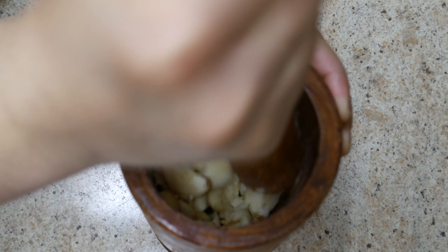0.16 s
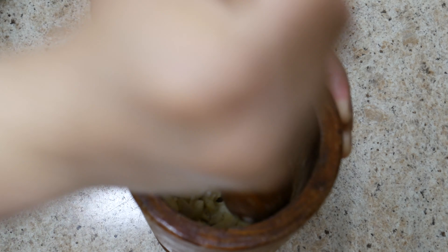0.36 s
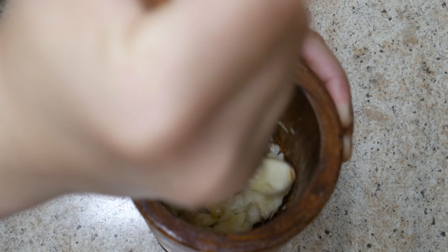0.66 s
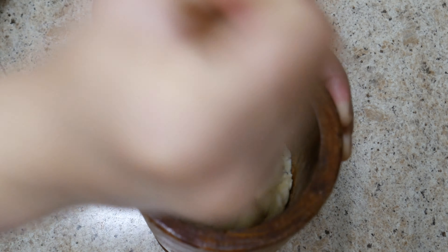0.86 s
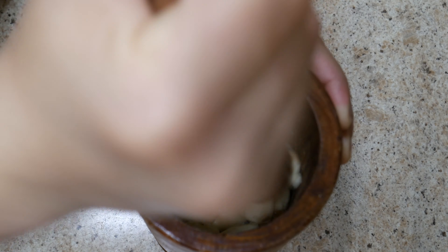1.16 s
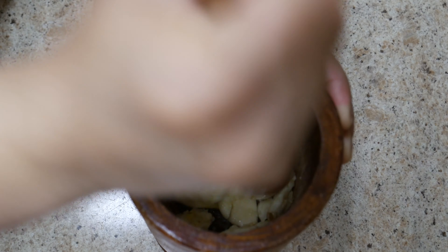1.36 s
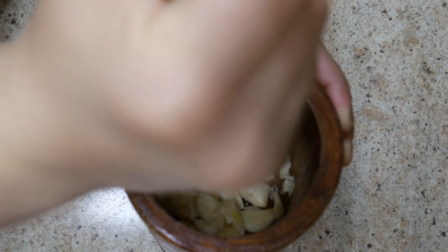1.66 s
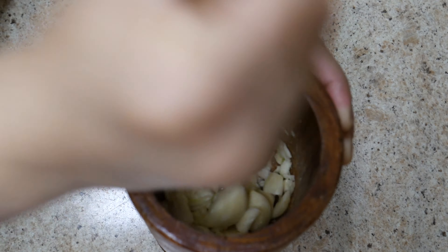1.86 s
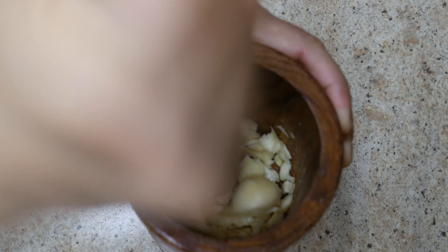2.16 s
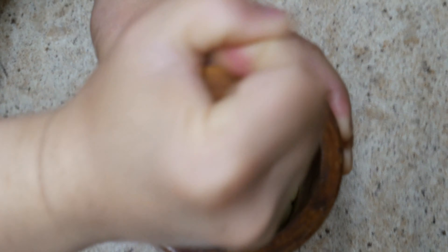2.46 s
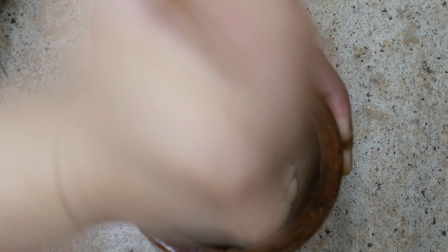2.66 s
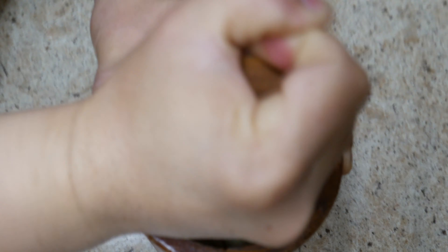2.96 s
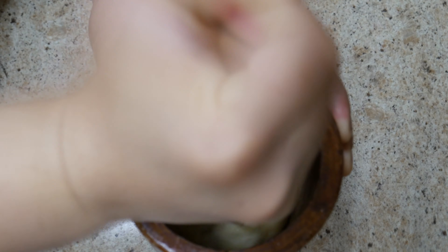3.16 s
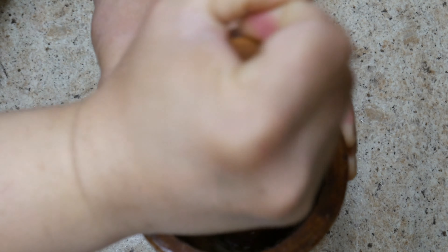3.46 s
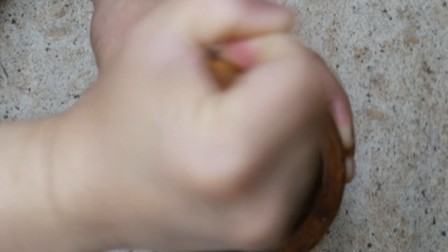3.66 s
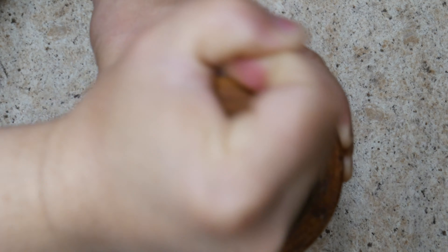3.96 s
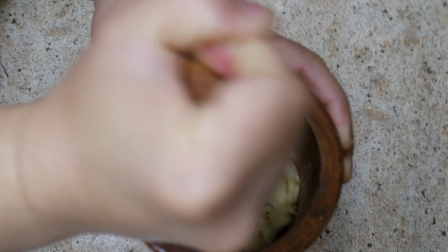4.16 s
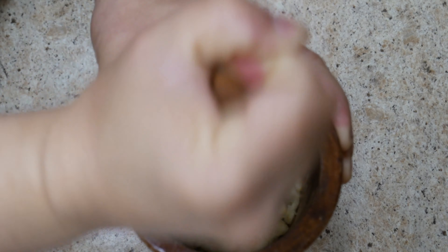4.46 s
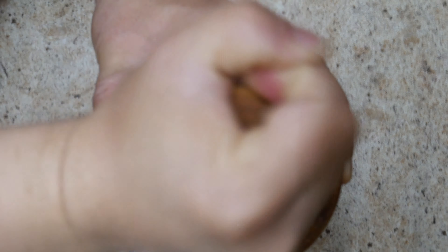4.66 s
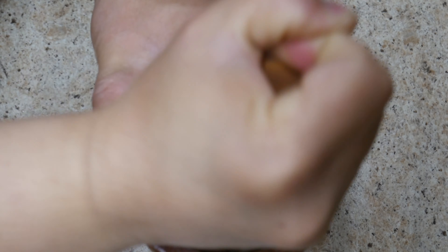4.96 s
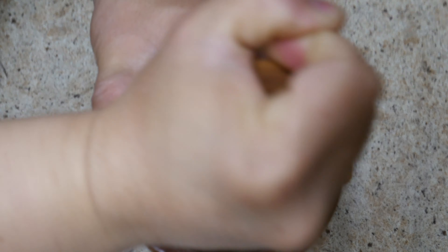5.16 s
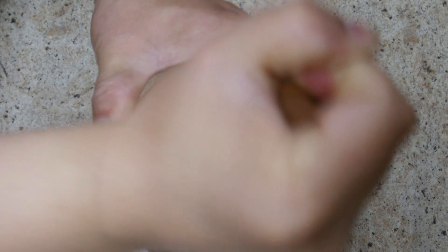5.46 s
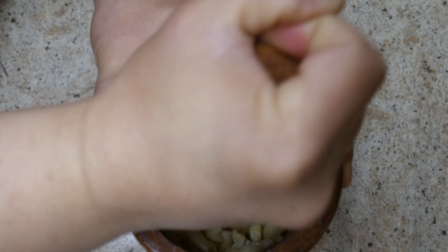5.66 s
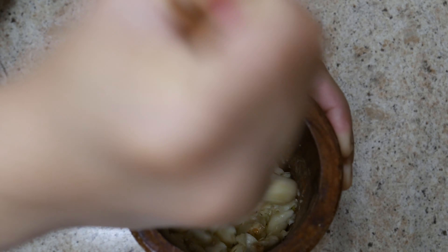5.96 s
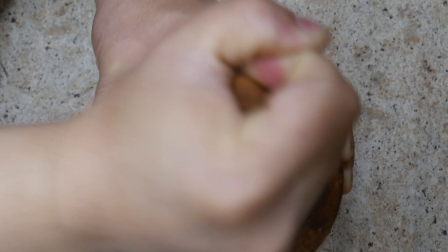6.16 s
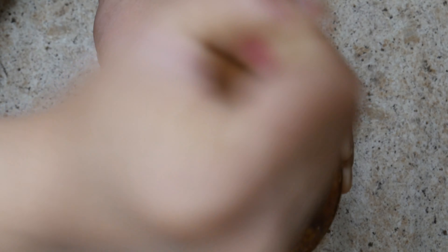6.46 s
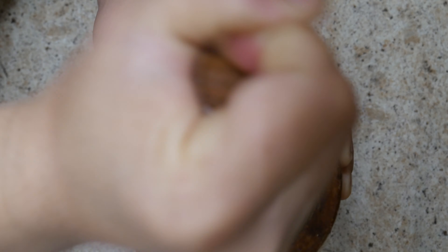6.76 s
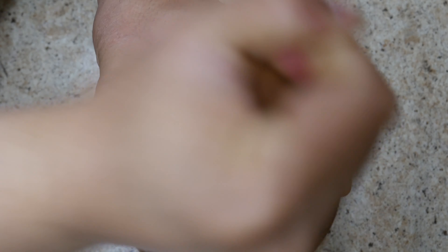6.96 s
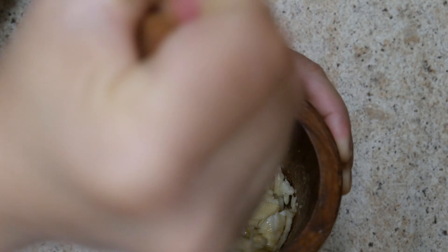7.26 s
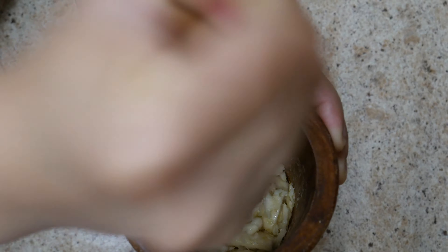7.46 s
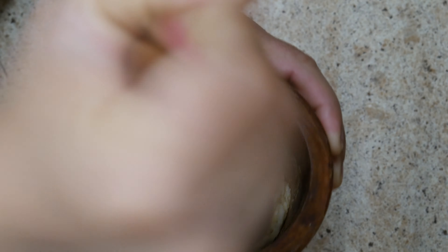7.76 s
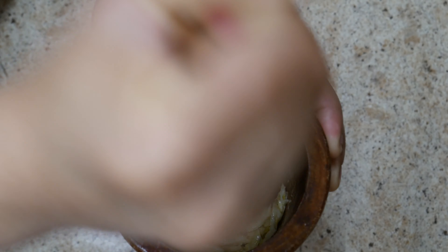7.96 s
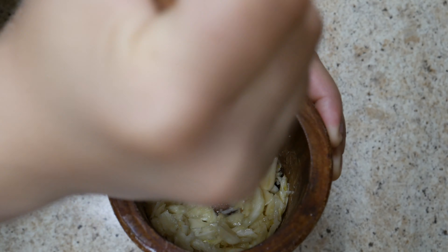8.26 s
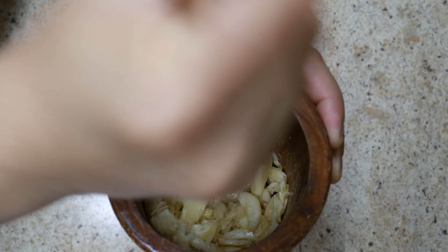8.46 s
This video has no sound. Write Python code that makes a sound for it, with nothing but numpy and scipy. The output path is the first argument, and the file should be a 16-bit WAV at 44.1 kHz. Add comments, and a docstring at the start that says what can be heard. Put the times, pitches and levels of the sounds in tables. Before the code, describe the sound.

Quick, regular thuds of a wooden pestle crushing garlic in a wooden mortar run from start to finish, heard close up in a small kitchen. The blows crunch and crack, mixed with uneven knocks and short scrapes on the side of the bowl. The sticky paste gives a brief squelch and squeak before the middle, and the side knocks grow stronger just afterwards. A faint house rumble lies underneath.

```python
"""A wooden pestle pounds garlic and salt in a wooden mortar, close by, four blows a second.
On the way down the pestle often knocks the wall and scrapes along it. The garlic fractures under
rising pressure until the pestle bottoms out with a crack, which excites the modes of the bowl and
thumps the counter. As it lifts, the wet paste crackles and now and then squeaks by stick-slip
friction, while the echoes of a small kitchen decay into the low rumble of the house."""
import sys
import numpy as np
from scipy import signal
from scipy.fft import rfft, irfft
from scipy.io import wavfile

SR = 44100
rng = np.random.default_rng(int(sys.argv[2]) if len(sys.argv) > 2 else 0)


def int16_out(signal):
    """Quantize to a 16-bit WAV file."""
    q = np.round(np.clip(np.atleast_2d(signal).T, -1, 1) * 32767)
    wavfile.write(sys.argv[1], SR, q.astype(np.int16))


N = 379409
RING_S = np.arange(SR // 2) / SR  # time since a contact
AROUND_S = np.arange(-(SR // 10), SR // 10) / SR  # time before and after a contact


def undb(db):
    """Decibels as an amplitude ratio."""
    return 10 ** (np.asarray(db) / 20)


def level(x, db):
    """Equal energy: scale a short sound to the energy of 50 ms at this level."""
    return x * undb(db) / np.sqrt(np.sum(x ** 2) / (SR / 20) + 1e-18)


def add(track, start_s, x):
    """Superposition: mix x into the track from start_s."""
    i = int(round(start_s * SR))
    a, b = max(i, 0), min(i + len(x), N)
    if b > a:
        track[a:b] += x[a - i:b - i]


def colour(x, points, size=2048):
    """Minimum-phase filtering through (frequency_hz, gain_db) points."""
    hz, db = np.transpose(points)
    bins_hz = np.arange(size // 2 + 1) * SR / size
    gain = undb(np.interp(np.log(bins_hz + 1), np.log(hz), db))
    cepstrum = irfft(np.log(gain))
    cepstrum[1:size // 2] *= 2
    cepstrum[size // 2 + 1:] = 0
    return signal.fftconvolve(x, irfft(np.exp(rfft(cepstrum))))[:len(x)]


def ring(modes, detune, scatter_db, build_s, wave=np.sin):
    """Damped modes build up and decay, a little different in pitch and strength at each touch."""
    tone = np.zeros(len(RING_S))
    for hz, db, t60_s in modes:
        pitch_hz = hz * (1 + detune * rng.standard_normal())
        gain = undb(db + scatter_db * rng.standard_normal())
        tone += gain * wave(2 * np.pi * pitch_hz * RING_S) * 1000 ** (-RING_S / t60_s)
    return tone * (1 - np.exp(-RING_S / build_s))


def push(x, contact_s):
    """Finite contact time: a force that rises quickly and eases off low-passes the blow."""
    t = RING_S[:SR // 50]
    return signal.fftconvolve(x, t * np.exp(-t / contact_s))[:len(x)]


def grains(size, per_s, spread_db, hiss, burst_db=2.0, burst_s=0.0029):
    """Shot noise: uneven tiny fractures over a hiss, in bursts as layer after layer gives way."""
    strengths = undb(spread_db * np.minimum(rng.exponential(size=size), 4)) * rng.standard_normal(size)
    clicks = strengths * (rng.random(size) < per_s / SR)
    bursts = np.interp(np.arange(size) / SR / burst_s, np.arange(size), rng.standard_normal(size))
    return (clicks / np.std(clicks) + hiss * rng.standard_normal(size)) * undb(burst_db * bursts)


# background spectrum of the house: frequency_hz, gain_db
HOUSE_SPECTRUM = [(12, -8.5), (22, 16), (40, 0), (100, -8), (200, -18), (480, -22.5), (900, -28.5),
                  (1500, -33), (4500, -43.5), (8500, -54.5), (11000, -57), (16000, -61)]


def room_tone():
    """Stationary noise: the low rumble and faint hiss of the house."""
    noise = colour(rng.standard_normal(N), HOUSE_SPECTRUM, size=8192)
    return noise / np.std(noise) * undb(-37.5)


def reflections():
    """Impulse response: early echoes off counter and near wall, a far-wall cluster, a diffuse tail."""
    t = np.arange(SR) / SR
    near, low, high, far = rng.standard_normal((4, SR))
    near *= np.exp(-t / 0.018) * (t > 0.004)
    far *= np.exp(-((t - 0.074) / 0.017) ** 2)
    low = signal.lfilter(*signal.butter(2, 3000, "low", fs=SR), low)
    high = signal.lfilter(*signal.butter(2, 3000, "high", fs=SR), high)
    low_t60_s, high_t60_s = 0.55, 0.61
    tail = (low * 1000 ** (-t / low_t60_s) + high * 1000 ** (-t / high_t60_s)) * np.minimum(t * 50, 1)
    return sum(undb(db) * x / np.linalg.norm(x) for x, db in ((near, -10), (tail, -14.5), (far, -24)))


# frequency response of the kitchen's echoes: frequency_hz, gain_db
KITCHEN_RESPONSE = [(40, -43), (150, 1), (250, -3), (350, 6), (500, -0.5), (680, -3), (1000, 6.5),
                    (2000, -3), (4000, -2.5), (9000, -3.5), (16000, -5)]


def kitchen(x):
    """Time-varying reverberation: the arm moves over the bowl, so each stroke has its own echoes."""
    out = np.zeros(N)
    landings_s = np.array(LANDINGS)[:, 0]
    edges = np.r_[0, (landings_s[1:] + landings_s[:-1]) / 2 * SR, N].astype(int)
    for a, b in zip(edges, edges[1:]):
        add(out, a / SR, signal.fftconvolve(x[a:b], reflections()))
    return colour(out, KITCHEN_RESPONSE)


# wet garlic slipping under the pestle: peak_s, level_db, half_width_s
SLIPS = [(.376, -43, .013), (3.431, -31, .012), (3.56, -51, .008)]
# resonances of the squeak: pitch_hz, gain_db, t60_s
SQUEAK_MODES = [(2240, -3.5, 0.028), (4890, -3, 0.032)]


def squeaks():
    """Stick-slip friction: short swells of slipping drive two narrow resonances."""
    out = np.zeros(N)
    t = AROUND_S
    for peak_s, level_db, half_width_s in SLIPS:
        slips = grains(len(t), per_s=3000, spread_db=1.2, hiss=0.3) * np.exp(-(t / half_width_s) ** 2)
        resonance = ring(SQUEAK_MODES, detune=0.008, scatter_db=1.5, build_s=0.00038)
        add(out, peak_s + t[0], level(signal.fftconvolve(slips, resonance), level_db))
    return out


# sticky smacks of the paste as the pestle pulls free: start_s, level_db, decay_s
SMACKS = [(0.365, -42, 0.017), (2.785, -55, .008), (3.352, -40.5, 0.023), (3.396, -29, 0.041),
          (3.426, -25.5, 0.009), (4.058, -47, 0.0027), (4.386, -34, 0.018), (4.556, -48, 0.0092),
          (5.596, -29.5, 0.022), (6.92, -43.5, .012)]
# spectrum of the sticky paste: frequency_hz, gain_db
PASTE_SPECTRUM = [(200, 8.5), (450, 10.5), (620, 10), (900, -2.5), (1600, -7), (2250, 4.5), (2900, -9),
                  (3600, -3), (4500, -2), (5050, -5), (5600, -4), (8500, -12), (10500, -22), (16000, -29)]


def paste():
    """Adhesion: the paste smacks as the pestle pulls free of it, and crackles faintly each time it lifts."""
    out = np.zeros(N)
    for start_s, level_db, decay_s in SMACKS:
        envelope = np.exp(-RING_S / decay_s) * (1 - np.exp(-RING_S / 0.0044))
        smack = grains(len(RING_S), per_s=1500, spread_db=1.3, hiss=1) * envelope
        add(out, start_s, level(colour(smack, PASTE_SPECTRUM), level_db))
    t = RING_S[:SR // 10]
    for landing_s, *_ in LANDINGS:
        for lift_s in rng.uniform(0.03, 0.16, size=2):
            crackle = grains(len(t), per_s=2800, spread_db=3.9, hiss=0.45) * t * np.exp(-t / 0.0036)
            add(out, landing_s + lift_s, level(colour(crackle, PASTE_SPECTRUM), rng.normal(-54.5, 1.9)))
    return out


# spectrum of wood striking wood: frequency_hz, gain_db
CLACK_SPECTRUM = [(400, -19), (750, 6), (1000, 1.5), (1400, -4), (1900, -1.5), (3000, -22), (5500, -21.5),
                  (9000, -41), (16000, -41)]


def clack(decay_s):
    """Modal overlap: crowded, heavily damped wood modes merge into a burst of noise."""
    return colour(rng.standard_normal(len(RING_S)) * np.exp(-RING_S / decay_s), CLACK_SPECTRUM)


# knocks on the mortar's wall: start_s, level_db, upper_relative_db, scrape_db
KNOCKS = [(.235, -49, -16, -50), (.4865, -29.5, -10.5, -39), (.974, -45, 7.5, -22.5),
          (1.2295, -34, -9, -16.5), (1.977, -30, -15, -18), (2.452, -39, -9, -31),
          (2.6934, -37.5, -6, -26.5), (3.1654, -33.5, -5, -52), (3.91, -53, -19, -27),
          (4.1498, -20.5, -1, -22), (4.3653, -22.5, -8.5, -37), (4.857, -30, -15, -35.5),
          (5.0616, -21, -8.5, -32), (5.3075, -22.5, -7.5, -27), (5.534, -31.5, -8, -27.5),
          (6.8254, -37, 12, -24.5), (7.03, -22.5, -5, -26.5), (8.278, -29.5, -12, -35),
          (8.5206, -30, 0, -52)]
# low and upper modes of the wall, struck with the pestle high: pitch_hz, gain_db, t60_s
WALL_LOW_MODE = [(769, -13.5, 0.04)]
WALL_UPPER_MODES = [(937, -1.5, 0.025), (1151, 11.5, 0.018), (1360, 2, 0.029), (1960, -25, 0.01),
                    (2105, -6.5, 0.042), (2440, -3, 0.031), (3540, -8, 0.034), (4700, -11, .012)]
# spectrum of the pestle sliding on the wall: frequency_hz, gain_db
SCRAPE_SPECTRUM = [(250, -3), (480, 1.5), (625, 13), (800, -14), (1150, -17), (1600, -21), (2250, -8.5),
                   (2800, -19.5), (5200, -19), (9000, -27), (10500, -37), (16000, -39)]


def wall():
    """Impact, then sliding friction: the pestle knocks the wall and scrapes down with growing force."""
    out = np.zeros(N)
    landings_s = np.array(LANDINGS)[:, 0]
    for start_s, level_db, upper_relative_db, scrape_db in KNOCKS:
        slide_s = landings_s[landings_s > start_s][0] - start_s
        air_hz = 679 - 680 * slide_s  # a knock higher up gives a longer slide and a lower note
        low = ring([(air_hz, -1.5, 0.047), *WALL_LOW_MODE], detune=0.012, scatter_db=2, build_s=0.0008)
        upper = ring(WALL_UPPER_MODES, detune=0.047, scatter_db=1.5, build_s=0.00072)
        upper = level(upper, 0) + level(clack(decay_s=0.0053), 1.1)
        base = ring(BASE_MODES, detune=0.057, scatter_db=2.3, build_s=0.0022)
        knock = level(low, 0) + level(upper, upper_relative_db) + level(base, -9)
        t = RING_S - slide_s  # zero at the landing, which damps the wall
        add(out, start_s, knock * np.exp(-np.maximum(t, 0) / 0.0048) * undb(level_db))
        scrape = colour(grains(len(t), per_s=3000, spread_db=1.5, hiss=0.41), SCRAPE_SPECTRUM)
        force = swell(t, rise_s=0.33, fall_s=0.0029)
        add(out, start_s, scrape / np.std(scrape) * force * undb(scrape_db))
    return out


def swell(t, rise_s, fall_s):
    """Exponential growth up to t = 0 and exponential decay after it."""
    return np.exp(np.where(t < 0, t / rise_s, -t / fall_s))


def slide_before(landing_s):
    """Duration of sliding contact with the wall before a landing; zero for a clean stroke."""
    return max((landing_s - s for s, *_ in KNOCKS if 0 < landing_s - s < 0.15), default=0)


# spectra of the crunch, the bowl's dull groan and the final crack: frequency_hz, gain_db
CRUNCH_SPECTRUM = [(300, 9), (900, -9.5), (1600, -4), (2100, -3.5), (3000, -3), (4600, -4), (6600, -8.5),
                   (8600, -4.5), (10200, -17), (12500, -13.5), (16000, -24)]
GROAN_SPECTRUM = [(40, -12.5), (120, 2), (250, -2.5), (420, 0), (650, 2.5), (850, -5.5), (1300, -22.5),
                  (3000, -21.5), (16000, -40)]
CRACK_SPECTRUM = [(500, 2.5), (1400, -7.5), (2050, -22.5), (2700, 3.5), (3400, -1.5), (4400, 0), (5400, -6),
                  (6600, -7.5), (8400, -5), (10000, -16.5), (12000, -16), (16000, -24)]


def garlic():
    """Fracture under load: cloves and salt crunch, shake the bowl and crack as the pestle lands."""
    out = np.zeros(N)
    t = AROUND_S
    for landing_s, weight_db, wood_db, crack_db, crunch_db, *_ in LANDINGS:
        start_s = landing_s + t[0]
        squeeze_s = 0.0042 + 0.025 * slide_before(landing_s)  # sliding slows the pestle
        pressure = swell(t, rise_s=squeeze_s, fall_s=0.0069)
        crunch = pressure * grains(len(t), per_s=6000, spread_db=1.94, hiss=0.55)
        add(out, start_s, level(colour(crunch, CRUNCH_SPECTRUM), crunch_db))
        groan = swell(t, rise_s=0.0055, fall_s=0.0026) * rng.standard_normal(len(t))
        add(out, start_s, level(colour(groan, GROAN_SPECTRUM), weight_db - 14))
        db_per_octave = 0.2 * (wood_db - USUAL_WOOD_DB)  # bare wood brightens the crack
        tilted = [(hz, db + db_per_octave * np.log2(hz / 3000)) for hz, db in CRACK_SPECTRUM]
        snap = swell(t, rise_s=0.0012, fall_s=0.0029)
        crack = snap * grains(len(t), per_s=14000, spread_db=1.3, hiss=1)
        add(out, start_s, level(colour(crack, tilted), crack_db))
    return out


# modes of the counter, the base rocking on it, the bowl with the pestle down in it,
# and the bending pestle: pitch_hz, gain_db, t60_s
COUNTER_MODES = [(20.84, -8.5, 0.38), (35.6, -16.5, 0.4), (41.5, -4, 0.37), (60, 0.5, 0.15),
                 (70.7, 2.5, 0.14), (83.6, -0.5, 0.22), (114.5, -3, 0.19)]
BASE_MODES = [(182, -0.5, 0.023), (223, 0.5, 0.059), (254.2, 8, 0.037), (316.8, 1.5, 0.054),
              (349, -9.5, 0.11)]
BOWL_MODES = [(664.7, 17, 0.031), (767, -4.5, 0.072)]
PESTLE_MODES = [(2004, -1.5, 0.028), (2166, 10, 0.009), (2230, -10, 0.004)]
# the pestle bottoms out: landing_s, weight_db, wood_db, crack_db, crunch_db, air_db, air_hz
LANDINGS = [(.0095, -22, -25, -39, -28, -23.5, 480), (0.2472, -16.5, -29.5, -42, -27, -28, 457),
            (0.4942, -15, -27.5, -39, -29, -24.5, 450), (0.742, -15.5, -24.5, -33.5, -30, -24.5, 453),
            (0.9857, -16, -24, -37, -34, -19, 454), (1.242, -17, -27, -39, -29.5, -30.5, 464),
            (1.4877, -22.5, -28.5, -24, -29.5, -31.5, 480), (1.735, -17.5, -21, -32, -30.5, -21, 490),
            (1.9862, -23, -34, -24, -35, -26.5, 476), (2.2275, -19.5, -33, -41, -26.5, -20.5, 483),
            (2.471, -15.5, -29.5, -44, -26, -26, 476), (2.709, -20.5, -25.5, -36.5, -24.5, -22.5, 457),
            (2.9581, -16.5, -30, -31, -27.5, -25.5, 457), (3.1991, -31, -26, -26.5, -31, -24, 489),
            (3.441, -23, -43, -39, -27, -22, 483), (3.6775, -20, -31.5, -31.5, -23, -28, 438),
            (3.926, -19, -31.5, -34, -24.5, -20, 454), (4.1748, -24, -38, -48, -30.5, -29, 476),
            (4.4201, -15, -21.5, -31.5, -27, -19, 486), (4.6698, -21.5, -28.5, -30.5, -25, -30.5, 453),
            (4.9119, -18.5, -28.5, -32.5, -25, -20.5, 480), (5.16, -17, -28.5, -27.5, -27, -32, 433),
            (5.3961, -19.5, -25, -29, -28.5, -22, 466), (5.6325, -21, -28.5, -43, -26.5, -24, 494),
            (5.8667, -13.5, -40.5, -39.5, -28, -24.5, 426), (6.1025, -14, -21, -26, -35, -25.5, 488),
            (6.3477, -20.5, -21, -26, -31.5, -21.5, 474), (6.6, -19.5, -27.5, -26, -37.5, -24, 456),
            (6.859, -16.5, -22.5, -26.5, -37, -27, 457), (7.0982, -20, -15, -33.5, -31, -21, 463),
            (7.342, -20.5, -35, -29.5, -26, -24.5, 468), (7.582, -16.5, -16, -23.5, -47.5, -21.5, 430),
            (7.8395, -21.5, -33, -36.5, -30.5, -29, 485), (8.0887, -15, -22.5, -30.5, -29, -31, 440),
            (8.3403, -16.5, -33, -32, -27, -30, 460), (8.5695, -14, -25.5, -35.5, -28.5, -28, 540)]
USUAL_WEIGHT_DB, USUAL_WOOD_DB, USUAL_CRACK_DB, USUAL_CRUNCH_DB = -18, -27, -33, -30


def mortar():
    """Impact excitation: each landing rings counter, base, enclosed air, bowl and pestle."""
    out = np.zeros(N)
    for landing_s, weight_db, wood_db, crack_db, crunch_db, air_db, air_hz in LANDINGS:
        counter = ring(COUNTER_MODES, detune=0.03, scatter_db=1, build_s=0.0004, wave=np.cos)
        add(out, landing_s - 0.0004, -level(push(counter, contact_s=0.00056), weight_db))
        # heavy blows and bare wood strengthen the rocking and the clack
        heavy_db, bare_db = weight_db - USUAL_WEIGHT_DB, wood_db - USUAL_WOOD_DB
        base_db = -21 + 0.86 * heavy_db + 0.25 * bare_db
        base = ring(BASE_MODES, detune=0.057, scatter_db=2.5, build_s=0.0049, wave=np.cos)
        add(out, landing_s - 0.0012, -level(push(base, contact_s=0.001), base_db))
        air = ring([(air_hz, 0, 0.05)], detune=0.0041, scatter_db=0, build_s=0.0028)
        bowl = ring(BOWL_MODES, detune=0.031, scatter_db=6.5, build_s=0.0078)
        add(out, landing_s - 0.001, level(air, air_db) + level(bowl, wood_db))
        cushion_db = 0.53 * (crunch_db - USUAL_CRUNCH_DB)  # crunching garlic softens the contact
        clack_db = -36 + 0.7 * heavy_db + 0.71 * bare_db - cushion_db
        add(out, landing_s - 0.002, level(clack(decay_s=0.0072), clack_db))
        glance_db = 3.5 * (slide_before(landing_s) > 0)  # glancing off the wall bends the pestle
        pestle_db = -36 + 0.69 * (crack_db - USUAL_CRACK_DB) + glance_db
        pestle = ring(PESTLE_MODES, detune=0.021, scatter_db=3, build_s=0.0013)
        add(out, landing_s - 0.002, level(pestle, pestle_db))
    return out


def scene():
    """Direct sound, reverberation and background noise add, the same in both ears."""
    wood_and_paste = mortar() + wall() + paste() + squeaks()
    # the crunch radiates different fine detail in each direction, and each finds its own echoes
    room = kitchen(wood_and_paste + garlic() / np.sqrt(2)) + kitchen(garlic() / np.sqrt(2))
    return np.tile(wood_and_paste + garlic() + room + room_tone(), (2, 1))


def record(dry):
    """Soft saturation rounds the hardest peaks, and a steep low-pass cuts the top."""
    rounded = dry / (1 + dry ** 6) ** (1 / 6)
    return signal.sosfilt(signal.ellip(10, 0.2, 80, 15900, fs=SR, output="sos"), rounded)


dry = scene()
out = record(dry)
int16_out(out)
```